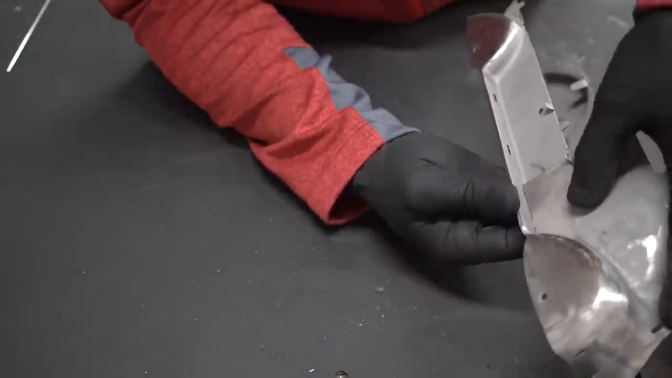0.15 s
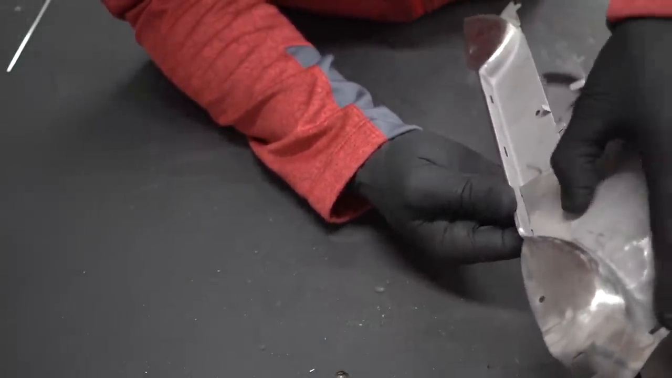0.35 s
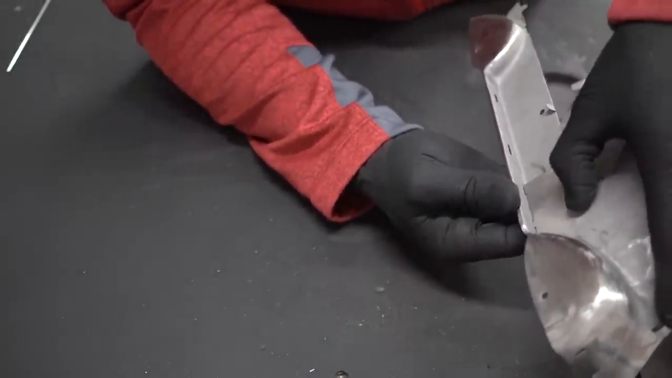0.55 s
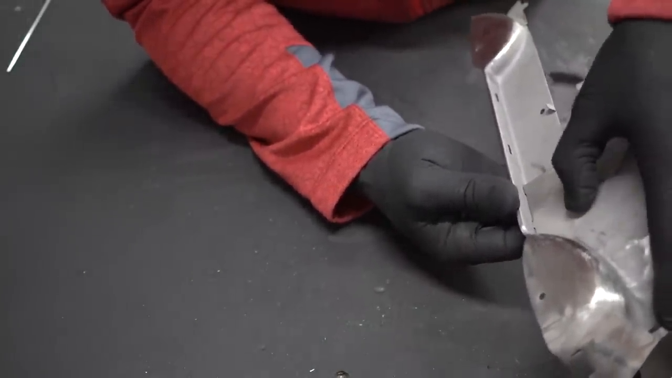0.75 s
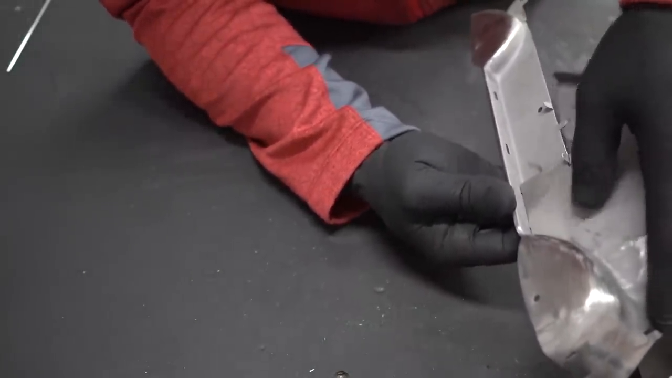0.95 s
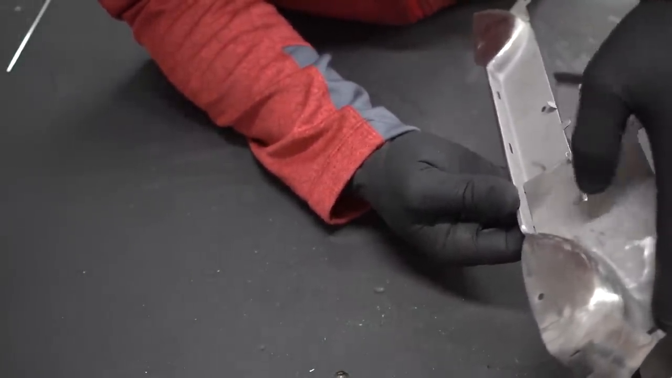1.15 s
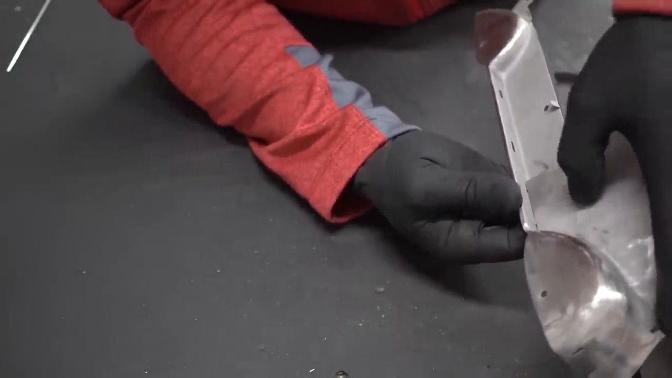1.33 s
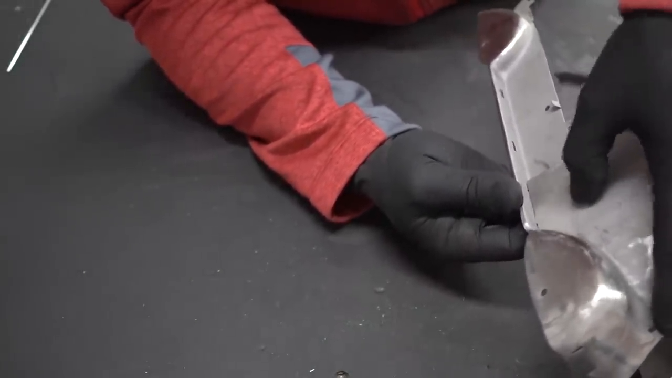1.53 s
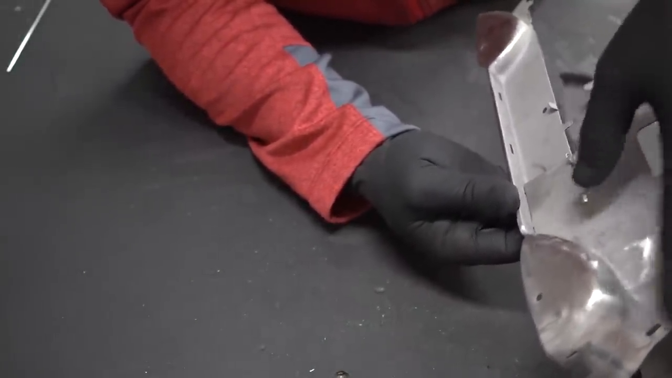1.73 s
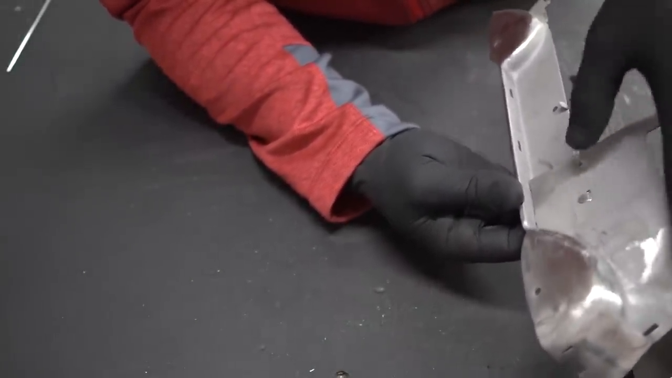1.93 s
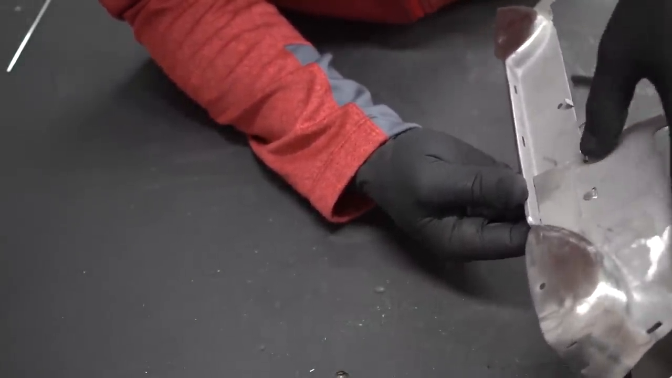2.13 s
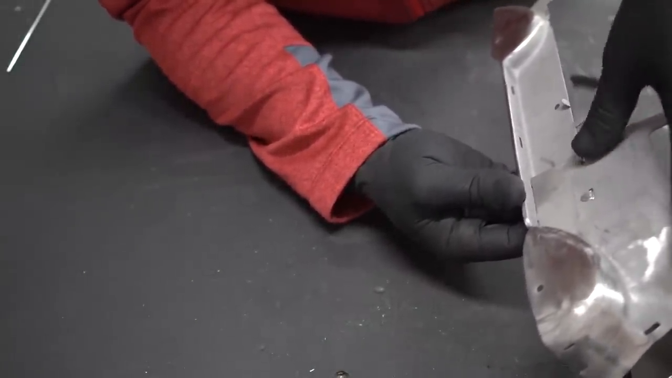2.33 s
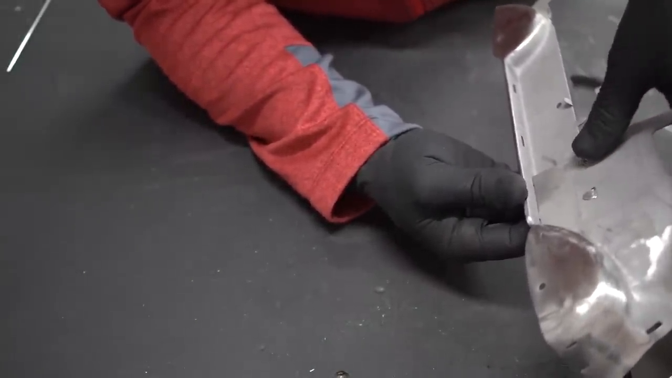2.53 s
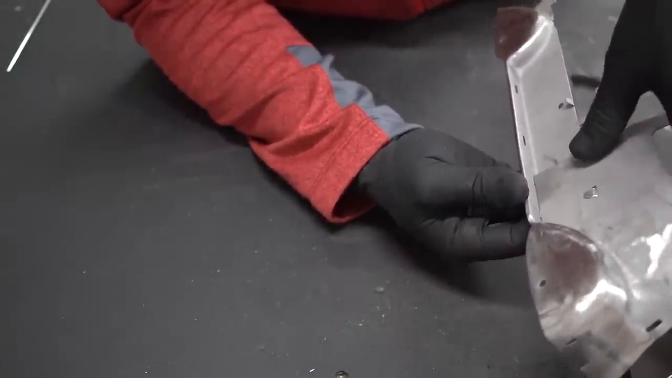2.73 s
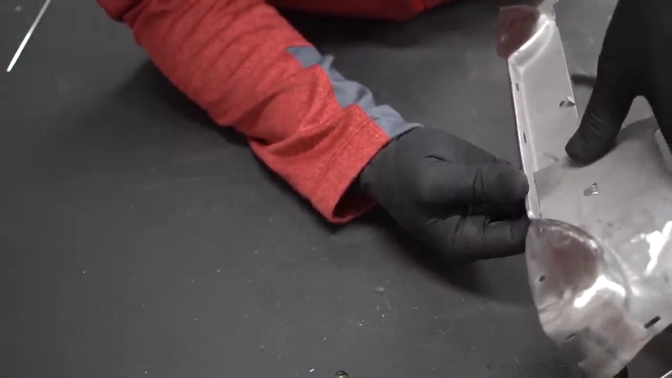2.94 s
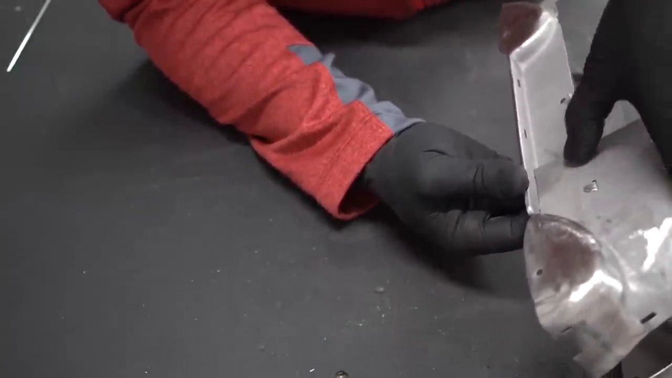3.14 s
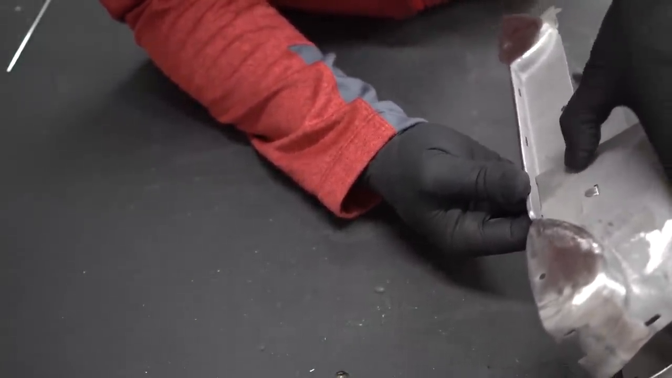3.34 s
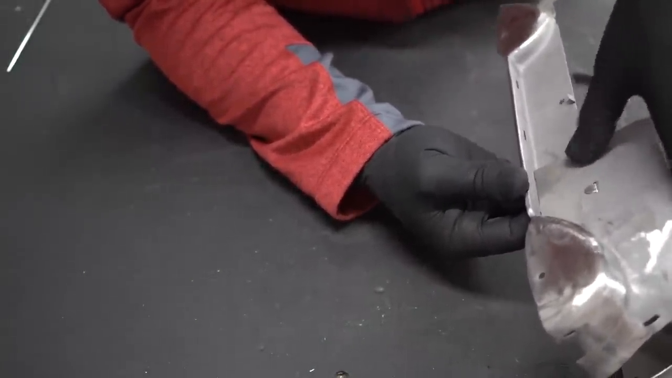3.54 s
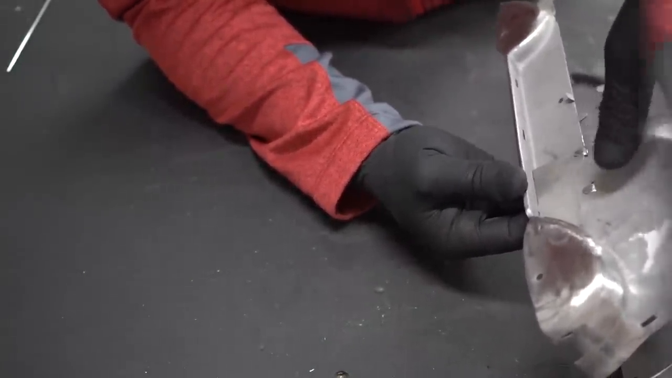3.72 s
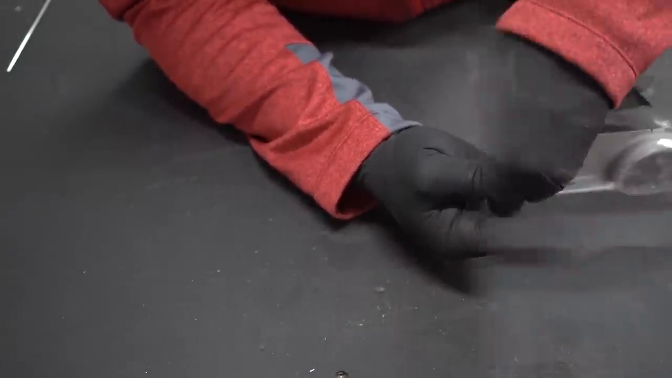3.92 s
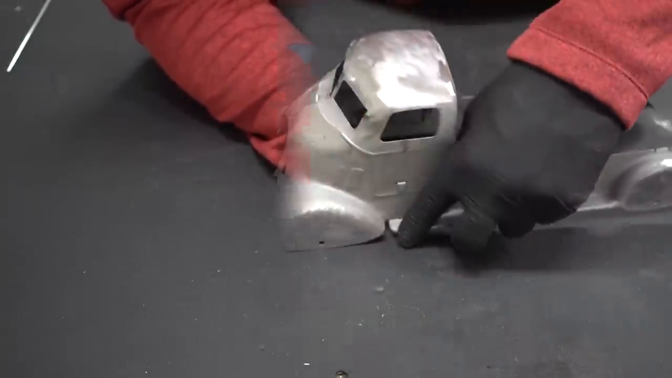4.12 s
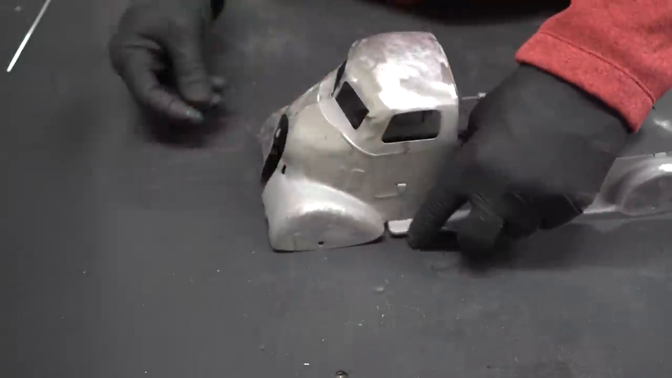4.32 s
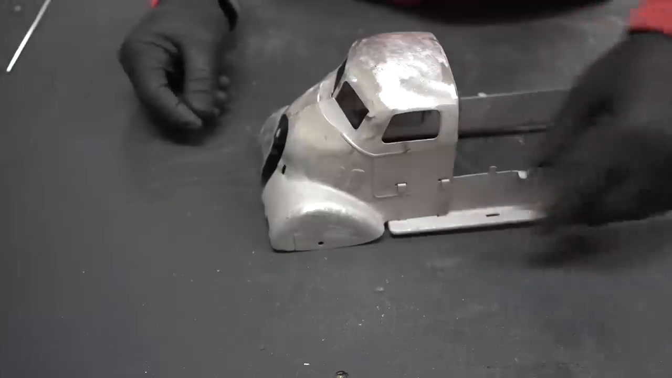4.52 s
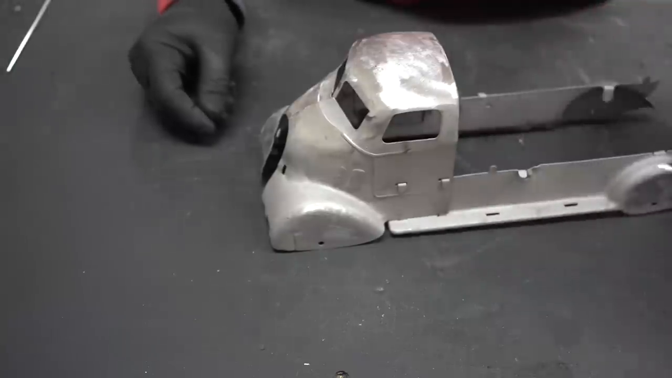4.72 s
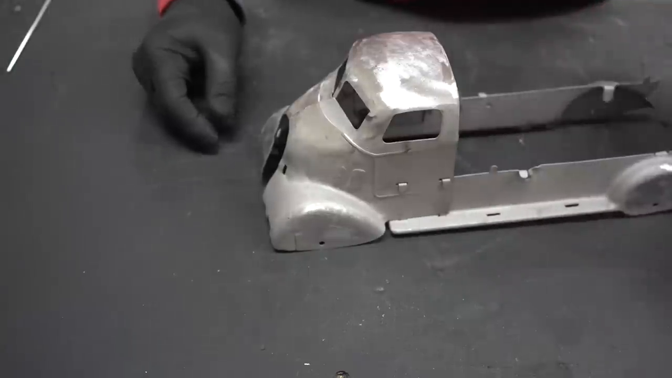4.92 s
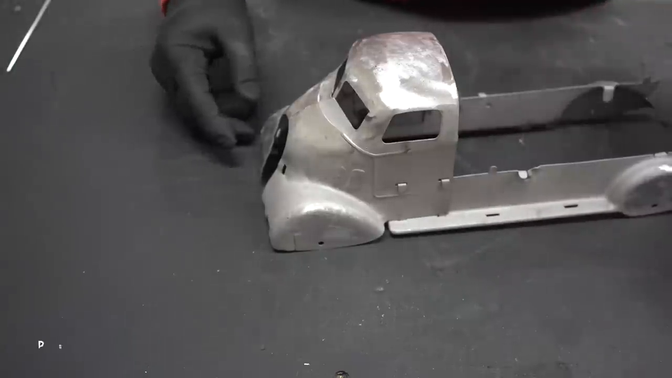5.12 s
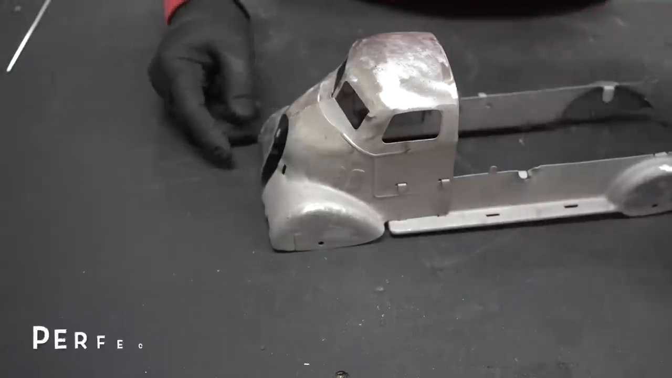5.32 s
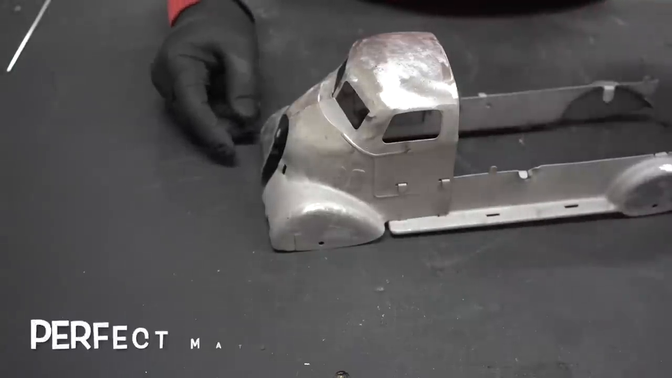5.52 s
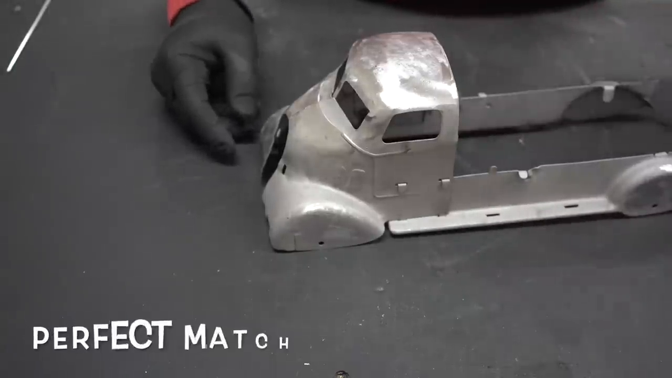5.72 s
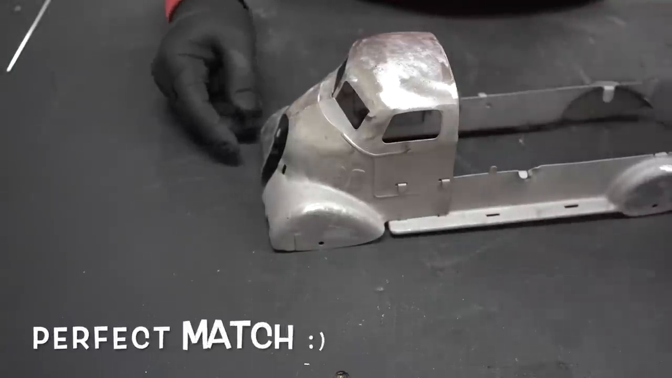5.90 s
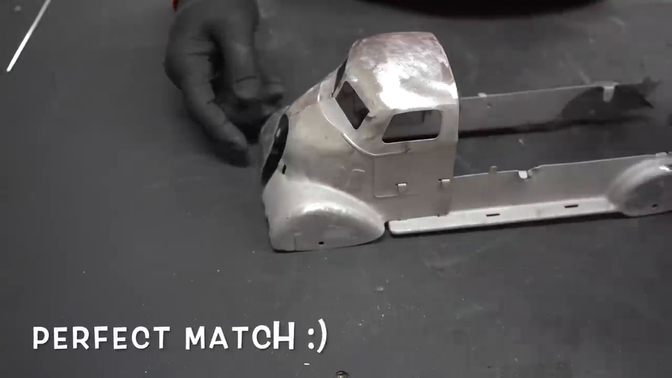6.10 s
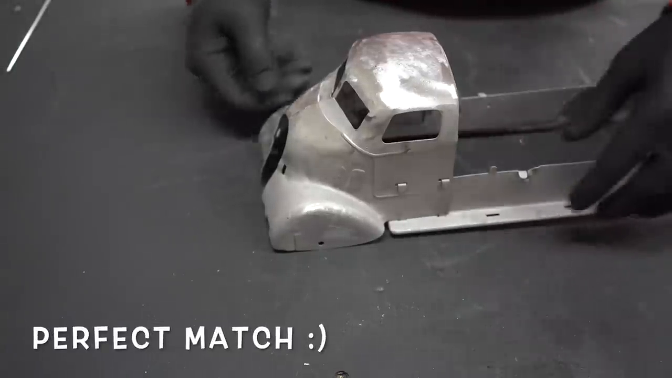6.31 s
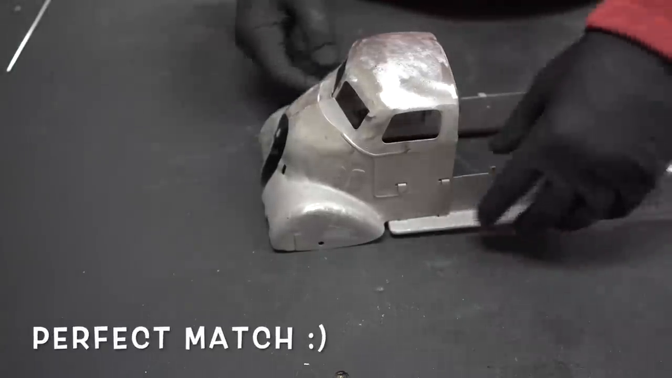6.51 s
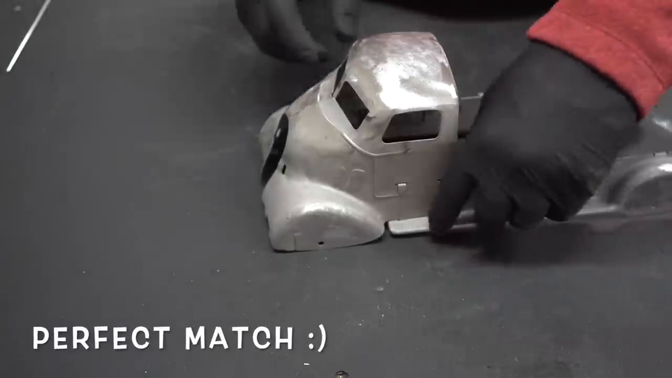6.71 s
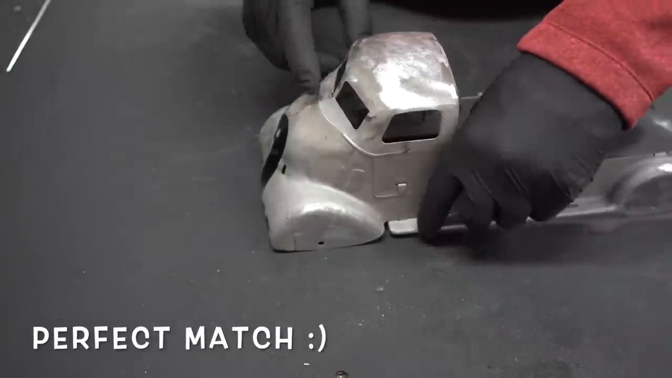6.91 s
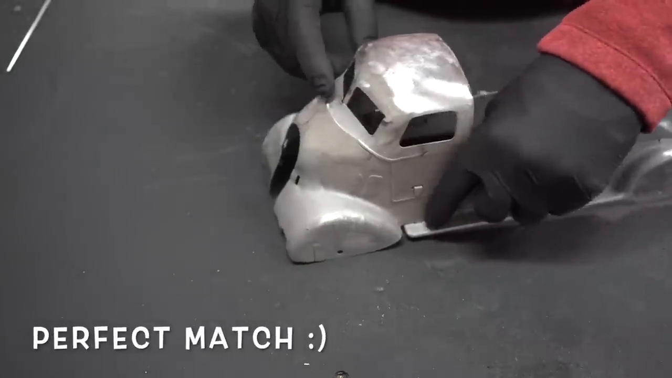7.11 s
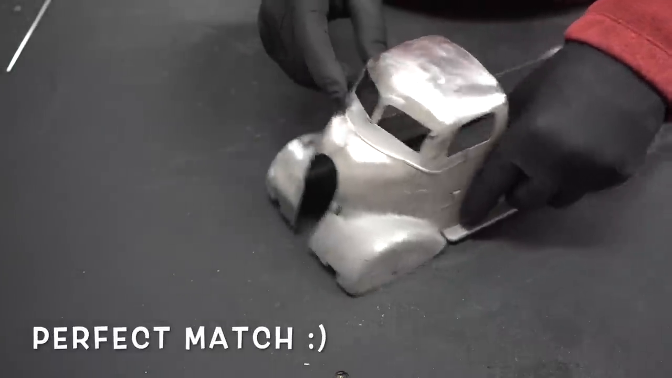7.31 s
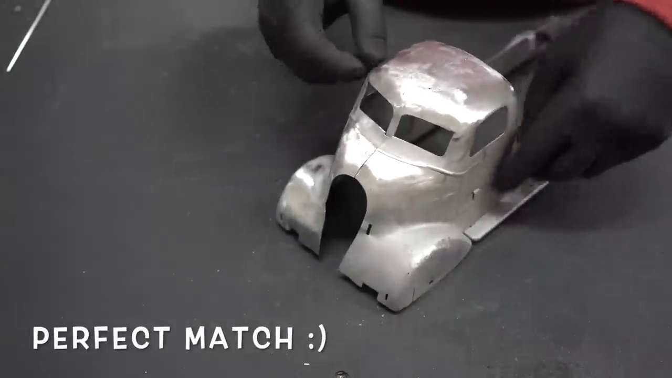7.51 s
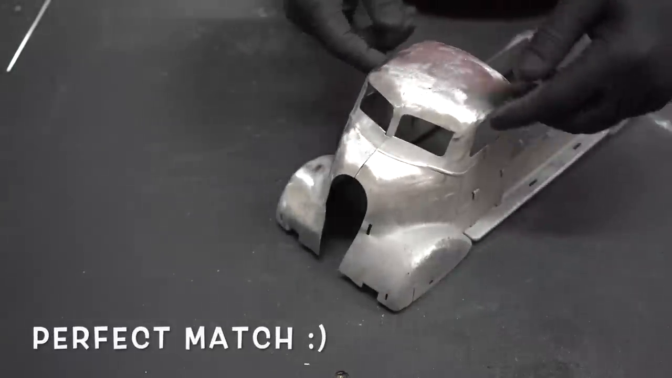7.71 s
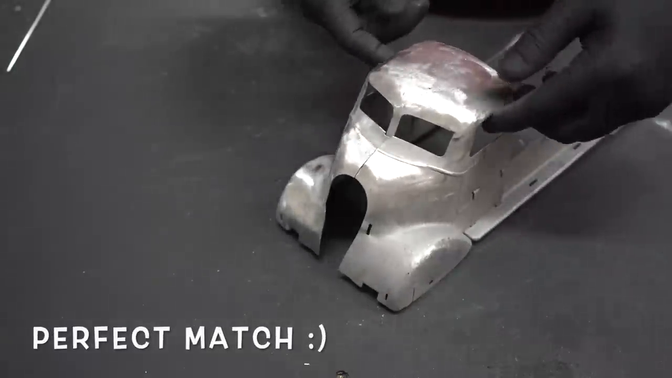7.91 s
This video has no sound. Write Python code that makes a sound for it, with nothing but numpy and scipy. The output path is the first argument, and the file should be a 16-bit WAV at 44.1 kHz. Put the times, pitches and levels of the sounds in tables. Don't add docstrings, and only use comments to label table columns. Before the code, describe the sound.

Sparse tab snaps, loose rattles and padded bumps come first, over low handling rumble. A firm glove rub leads to a cluster of knocks as the metal body lands on the bench. Quiet tinkles and a dusty pull follow, a pure steel ring fades, then a rough ringing scrape peaks near the end. Close microphones, slightly right, short room echo, faint hiss.

```python
import sys
import numpy as np
from scipy import signal
from scipy.fft import rfft, irfft, next_fast_len
from scipy.io import wavfile

SR = 44100
rng = np.random.default_rng(int(sys.argv[2]) if len(sys.argv) > 2 else 0)


def gain_from_decibels(decibels):
    exponent = np.asarray(decibels, float) / 20
    return 10 ** exponent


def materialize(psi):
    bounded = np.clip(np.atleast_2d(psi).T, -1, 1)
    quanta = np.round(bounded * 32767).astype(np.int16)
    wavfile.write(sys.argv[1], SR, quanta)


N = 350595


def unit(x):
    return x / np.sqrt(np.mean(x ** 2) + 1e-20)


def along(points, hz):
    f, v = np.transpose(points)
    return np.interp(np.log(hz + 1), np.log(f + 1), v)


def filtered(x, response):
    m = next_fast_len(x.shape[-1] + 8192)
    spectrum = rfft(x, m) * response(np.fft.rfftfreq(m, 1 / SR))
    return irfft(spectrum, m)[..., :x.shape[-1]]


def body(modes):
    def resonance(f, center, width, db):
        return gain_from_decibels(db) * 1j * f * width / (center * center - f * f + 1j * f * width)
    return lambda f: sum((-1) ** k * resonance(f, *mode) for k, mode in enumerate(modes))


def band(x, low_hz, high_hz):
    return unit(signal.sosfilt(signal.butter(3, [low_hz, high_hz], "band", fs=SR, output="sos"), x))


def fade(t, t60, attack=0.00013):
    return gain_from_decibels(-60 * t / max(t60, .004)) * (1 - np.exp(-t / attack))


def add(track, s, sound):
    part = track[round(s * SR):][:len(sound)]
    part += sound[:len(part)]


# (frequency [Hz], likeness)
LIKENESS = [(25, 1), (60, 1), (290, 0.99), (640, 0.64), (1400, 0.028), (6800, -0.21), (15000, -0.021)]


def paired(pair):
    turn = lambda hz: np.arccos(np.clip(along(LIKENESS, hz), -1, 1)) / 2
    mid, side = filtered(pair, lambda hz: np.array([np.cos(turn(hz)), np.sin(turn(hz))]))
    return np.array([mid + side, mid - side])


# (frequency [Hz], level [dB per Hz])
AIR_COLOR = [(13, -32), (22, -1.5), (118, -1.5), (184, -14), (249, 0), (330, -18), (1400, -19),
             (16000, -29)]


def air():
    hiss = filtered(rng.standard_normal((2, N)), lambda hz: gain_from_decibels(along(AIR_COLOR, hz)))
    return gain_from_decibels(-55) * unit(paired(hiss))


# (frequency [Hz], t60 [s])
ECHO_T60 = [(100, 0.44), (700, 0.77), (2000, 0.59), (5000, 0.54), (13000, 0.28)]


def workshop(x, size=16384):
    out = np.zeros((2, N + size + 2 * SR))
    for start in range(0, N, size):
        hz, t, z = signal.stft(rng.standard_normal((2, SR * 3 // 4)), SR, nperseg=256)
        decay = gain_from_decibels(-60 * t / along(ECHO_T60, hz)[:, None])
        tail = signal.istft(z * decay, SR, nperseg=256)[1]
        echo = signal.fftconvolve(x[None, start:start + size], tail / np.linalg.norm(tail[0]), axes=1)
        out[:, start + 200:][:, :echo.shape[1]] += echo
    return paired(out[:, :N])


def ports(x, lean_db, lag_s):
    def half(hz):
        shade = gain_from_decibels(lean_db / 2 * hz / (hz + 1500))
        return shade * np.exp(1j * np.pi * hz * lag_s / (1 + hz / 1600))
    return np.array([filtered(x, lambda hz: 1 / half(hz)), filtered(x, half)])


# (frequency [Hz], width [Hz], level [dB])
FRAME_MODES = [(116.4, 8.3, 0)]
BENCH_MODES = [(185, 26, -4), (250, 39, -3.5), (267.3, 20.6, 2), (334, 21, -2.5), (371.3, 26.3, -2),
               (483.6, 97, -10)]
PANEL_MODES = [(614, 71, 1.5), (777, 11.6, 6.5), (836, 8, 6), (893, 95, -1.5), (1104, 42, -4.5),
               (1224, 73, -4), (1560, 1580, -12.5)]
SHELL_MODES = [(3110, 31, -18), (3320, 34, -8.5), (4320, 230, -6), (6360, 51, 8.5), (8440, 89, 0)]


def friction(gains, grit, lumpy_db, shell):
    boom, rumble, drone, scrape = gains
    lumps = np.minimum(rng.exponential(size=N // 128 + 1), 3.5)
    grains = gain_from_decibels(lumpy_db * lumps.repeat(128)[:N]) * rng.standard_normal((4, N))
    bright = lambda hz: gain_from_decibels(along(grit, hz)) * (1 + shell * np.abs(body(SHELL_MODES)(hz)))
    return (boom * unit(filtered(grains[0], body(FRAME_MODES)))
            + rumble * unit(filtered(grains[1], body(BENCH_MODES)))
            + drone * unit(filtered(grains[2], body(PANEL_MODES)))
            + scrape * unit(filtered(grains[3], bright)))


def strokes(rows, axis=2):
    t = np.arange(N) / SR
    swell_db, let_go = 28.5, 1.02
    total = 0
    for row in rows:
        peak_s, build_s = row[:2]
        distance = np.maximum(peak_s - t, (t - peak_s) / let_go) / build_s
        total = total + gain_from_decibels(row[axis] - swell_db * distance)
    return total


# (peak time [s], build-up [s], level [dB])
LEANING = [(0, 0.38, -29.5), (1.3, 0.1, -33), (1.67, 0.36, -43), (2.23, 0.41, -38), (2.58, 0.19, -41),
           (3.7, 0.058, -58), (4.2, .15, -47), (4.39, 0.083, -37), (5.31, .3, -54), (6.0, 0.18, -29.5),
           (6.33, .2, -69), (6.74, .25, -49)]
# (peak time [s], build-up [s], bench rumble [dB], panel drone [dB])
SHIFTING = [(.38, 0.13, -46, -42.5), (.85, 0.11, -63, -35.5), (.93, .1, -43, -41), (1.1, .15, -61, -53),
            (1.39, 0.29, -50, -44.5), (1.67, 0.41, -50, -66), (1.92, 0.6, -39.5, -45),
            (2.23, 0.16, -52, -57), (2.5, 0.37, -63, -62), (2.99, 0.13, -47, -49.5), (3.23, 0.36, -48, -47),
            (3.62, 0.17, -37.5, -40), (4.1, 0.077, -54, -29), (4.22, 0.36, -33, -33.5),
            (4.39, 0.04, -62, -57), (4.82, 0.093, -43.5, -47.5), (4.97, 0.45, -51.5, -50),
            (5.31, 0.37, -57, -60), (6.25, 0.44, -61, -59), (6.98, 0.58, -58, -56)]
# (peak time [s], build-up [s], level [dB])
RUBBING = [(.83, 0.11, -63), (1.39, 0.083, -62), (1.67, 0.3, -43.5), (1.81, 0.3, -48.5), (2.23, .17, -47),
           (2.6, 0.31, -52.5), (3.12, 0.069, -43), (3.7, 0.14, -25.5), (3.81, 0.11, -46), (4.08, 0.12, -58),
           (4.39, 0.2, -45), (4.8, 0.19, -45.5), (5.4, 0.9, -57.5), (6.2, 0.17, -59), (6.6, 0.12, -62),
           (6.9, 0.36, -50.5), (7.92, 0.13, -45)]
IDLE_DB = (-46, -68.5, -116, -72)
# (frequency [Hz], level [dB per Hz])
GLOVE_COLOR = [(880, -35), (1500, 0), (2080, 6.5), (2460, 4), (2910, 1), (3550, 4), (13800, 1), (16000, -1)]


def handling():
    moves = [strokes(LEANING), strokes(SHIFTING), strokes(SHIFTING, axis=3), strokes(RUBBING)]
    gains = [gain_from_decibels(-6.5) * (move + gain_from_decibels(db)) for move, db in zip(moves, IDLE_DB)]
    return friction(gains, GLOVE_COLOR, lumpy_db=3.5, shell=0.18)


def drag(passes, grit, trim_db, grit_db, lumpy_db, shell):
    frame_db, grit_grows, full_speed_db = 2, 1.82, -22
    gains = 0
    for rows in passes:
        s, *controls = np.transpose(rows)
        weight, speed = [np.interp(np.arange(N) / SR, s, c, -120, -120) for c in controls]
        scrape = grit_db + speed + (grit_grows - 1) * (speed - full_speed_db)
        gains = gains + gain_from_decibels(trim_db + np.array([weight + frame_db, weight, speed, scrape]))
    return friction(gains, grit, lumpy_db, shell)


# (time [s], weight on the bench [dB], sliding speed [dB])
PULL_PATH = [(5.425, -57, -56), (5.474, -36.5, -48), (5.51, -39, -43), (5.602, -28, -37.5),
             (5.688, -34.5, -31.5), (5.82, -19, -33), (5.854, -42, -38.5), (5.89, -29, -32),
             (5.95, -43, -36.5)]
# (frequency [Hz], level [dB per Hz])
DUST_COLOR = [(880, -31), (1500, -4), (1670, 14), (2210, 3), (2660, -9), (4970, -20), (14100, -26),
              (16000, -27)]


def pull():
    return drag([PULL_PATH], DUST_COLOR, trim_db=-1.5, grit_db=-1.0, lumpy_db=3.0, shell=0.4)


# (time [s], weight on the bench [dB], sliding speed [dB])
TURN_PATH = [(6.99, -72, -76), (7.026, -49, -33.5), (7.134, -14, -32), (7.15, -16.5, -19),
             (7.3, -22, -19.5), (7.35, -35, -21), (7.368, -40, -33)]
SWING_PATH = [(7.355, -61, -45), (7.37, -25.5, -27), (7.453, -17.5, -16.5), (7.5, -20.5, -27),
              (7.525, -19, -30), (7.545, -27, -25.5), (7.638, -49, -34.5), (7.78, -38.5, -43),
              (7.95, -73, -60)]
# (frequency [Hz], level [dB per Hz])
GRIT_COLOR = [(880, 2.5), (1500, -1), (2720, 0.5), (5380, -3), (6370, -2.5), (6760, -1.5), (13900, -7),
              (16000, -23)]


def turn_and_swing():
    return drag([TURN_PATH, SWING_PATH], GRIT_COLOR, trim_db=-4.0, grit_db=0.0, lumpy_db=3.0, shell=1.05)


# (frequency [Hz], level [dB], t60 [s])
PART_MODES = [(2130, -1.5, 0.091), (4460, -4.5, 0.19), (5140, -3, .06), (5453, -5, 0.27), (9100, -3, .12),
              (10250, 3.5, 0.089), (12150, -15, .15)]
WASHER_MODES = [(4720, -15, 0.17), (5900, -24, 0.3), (6460, -5, 0.13), (7359, -25, 0.28), (8450, -9, 0.29),
                (11650, -13, 0.18)]
RIVET_MODES = [(5539, 0, .25), (3526, -3, .08)]
TAB_MODES = [(1647, 0, .07), (388, 4, .09), (6480, -9, .07), (7300, -8, .07), (9340, -9, .06)]
LUG_MODES = [(3960, -3, .03), (4150, 0, .035), (4370, -2, .03)]
RIM_MODES = [(1246, 5.5, 0.12), (720, 6, 0.036), (1447, -8, 0.064), (3500, -13, .08)]
# (time [s], level [dB])
PART_TOUCHES = [
    (4.741, -55),
    (4.827, -47),
    (4.84, -50),
]
WASHER_HITS = [
    (4.525, -52),
    (4.536, -49),
]
RIVET_HITS = [
    (4.157, -45),
    (4.22, -49),
    (4.29, -51),
]
TAB_HITS = [
    (.773, -46),
    (.795, -42),
    (.822, -45),
]
LUG_HITS = [
    (3.894, -41),
    (3.905, -62),
    (3.918, -48),
]
RIM_HITS = [
    (1.628, -42),
    (1.68, -47),
    (1.74, -56),
    (3.655, -43),
    (3.688, -39.5),
    (3.73, -48),
    (3.79, -49),
]


def parts():
    out, t = np.zeros(N), np.arange(SR // 2) / SR
    sources = [(PART_TOUCHES, PART_MODES), (WASHER_HITS, WASHER_MODES), (RIVET_HITS, RIVET_MODES),
               (TAB_HITS, TAB_MODES), (LUG_HITS, LUG_MODES), (RIM_HITS, RIM_MODES)]
    for touches, modes in sources:
        for s, db in touches:
            for hz, level, t60 in modes:
                strength = gain_from_decibels(db + level + rng.normal(0, 1.5))
                blur = .035 * np.cumsum(rng.standard_normal(len(t)))
                add(out, s, strength * fade(t, min(t60, .25)) * np.sin(2 * np.pi * hz * t + blur))
    return out


# (frequency [Hz], level [dB], t60 [s], left over right [dB], left-right phase [rad])
TOOL_MODES = [(1957, -26, .58, -5, .9), (1970, -37, .8, 3, -1.5), (4860, -23.5, 1.25, 6, 3.0),
              (4862.7, -23.5, .62, -8, .6), (9468, -20, .56, -6, -.8), (9474, -33, .5, 0, -2.0),
              (15250, -36, .5, 1, -2.2)]
# (time [s], level [dB])
TOOL_HITS = [
    (5.8465, -6),
    (5.859, -5),
]


def tool():
    out, t, side = np.zeros((2, N)), np.arange(SR) / SR, np.array([[.5], [-.5]])
    for s, db in TOOL_HITS:
        since_first = t + s - TOOL_HITS[0][0]
        ring = 0
        for hz, level, t60, pan_db, turn in TOOL_MODES:
            wave = np.sin(2 * np.pi * hz * since_first + side * turn)
            ring = ring + gain_from_decibels(db + level + side * pan_db) * fade(t, t60) * wave
        out[:, round(s * SR):][:, :SR] += ring
    return out


def knocks(rows, clack_db):
    out, t = np.zeros(N), np.arange(SR // 2) / SR
    frame_hz = FRAME_MODES[0][0]
    for s, db, hz, boom_db in rows:
        top = -np.sin(2 * np.pi * hz * t) * fade(t, 11 / hz)
        boom = gain_from_decibels(boom_db + 10.5) * np.sin(2 * np.pi * frame_hz * t) * fade(t, 0.18, attack=0.0059)
        clack = gain_from_decibels(clack_db) * band(rng.standard_normal(len(t)), 302, 1177) * fade(t, 0.048)
        add(out, s, gain_from_decibels(db + 5.5) * (top + boom + clack))
    return out


# (time [s], peak level [dB], pitch [Hz], boom [dB])
HAND_BUMPS = [(.775, -29.5, 412, -39), (1.018, -22.5, 306, -23), (1.058, -37, 340, -22),
              (1.552, -35, 172, -19), (1.578, -32.5, 382, -17), (1.807, -29, 337, -36),
              (1.827, -25, 255, 0), (1.99, -37, 197, -20), (2.925, -42.5, 450, -22), (4.768, -49, 267, 1),
              (5.461, -32, 230, -24), (7.013, -31, 243, -8.5)]


def hand_thumps():
    return knocks(HAND_BUMPS, clack_db=-14)


# (time [s], peak level [dB], pitch [Hz], boom [dB])
METAL_BLOWS = [(.328, -36.5, 410, -12), (.838, -33, 258, -2), (1.416, -41.5, 244, 9),
               (2.728, -48.5, 353, -26), (3.105, -34.5, 197, -7.5), (3.204, -32.5, 188, -5),
               (3.249, -40.5, 220, -33), (3.423, -46, 486, -22.5), (3.528, -32, 240, -3),
               (3.689, -35.5, 186, -29), (4.019, -28, 358, -36), (4.035, -22.5, 276, -7.5),
               (4.148, -18, 248, -19), (4.822, -39.5, 210, -13), (4.996, -45, 324, -8),
               (7.535, -12.5, 268, -17), (7.785, -35.5, 185, -8)]


def metal_knocks():
    return knocks(METAL_BLOWS, clack_db=-8.5)


def snaps(rows, t60, trim_db, sharp=.9, rise_s=.0002):
    out, t = np.zeros(N), np.arange(SR // 4) / SR
    for s, db, panel_db, edge_db, hz in rows:
        noise = rng.standard_normal((4, len(t)))
        tick = sharp * fade(t, .006, attack=.0001)
        sheet = band(noise[0], 2220, 8200) * (tick + fade(t, t60, rise_s))
        cluster = 1.5 * band(noise[1], .87 * hz, 1.13 * hz) * fade(t, .45 * t60, rise_s)
        sizzle = band(noise[2] + .5 * np.roll(noise[2], 1), 7000, 16000)
        edge = gain_from_decibels(edge_db) * sizzle * (tick + fade(t, 1.77 * t60, rise_s))
        panel = gain_from_decibels(panel_db) * band(noise[3], 760, 1970) * fade(t, 1.28 * t60, rise_s)
        add(out, s - .0006, gain_from_decibels(db + trim_db) * (sheet + cluster + edge + panel))
    return out


# (time [s], peak level [dB], low panel [dB], edge [dB], ring [Hz])
CATCHES = [(.0897, -38.5, 3, -4, 5100), (1.9844, -27.5, 2, -6, 2360), (2.1206, -23.5, 0, -18, 2980),
           (3.5309, -15.5, -2, -11.5, 3770), (5.7115, -35, 21, -23, 1950), (6.8302, -47, -12, -10, 3120),
           (7.108, -38, -2, -23, 1890), (7.1471, -19, -13, -11, 4570), (7.199, -26, 5, 1, 1960),
           (7.4092, -5, -13, -6.5, 3230), (7.4639, -20, 5, 8, 3120), (7.4994, -25, 14.5, 8, 2360)]


def jolts():
    return snaps(CATCHES, t60=0.019, trim_db=-11)


# (time [s], peak level [dB], low panel [dB], edge [dB], ring [Hz])
SHEET_FLEXES = [
    (.7701, -45, -9, -9, 2600),
    (1.5974, -39, -0.5, -2, 3000),
    (1.8098, -46, -8, -35, 3470),
    (1.8327, -48.5, 4, -6.5, 1840),
    (2.9094, -56.5, 6.5, -4, 2730),
    (3.1144, -44.5, -8, -16, 2160),
    (4.0274, -35.5, -25, -38.5, 2470),
]


def flexes():
    return snaps(SHEET_FLEXES, t60=0.25, trim_db=-6, sharp=0, rise_s=0.002)


# (time [s], peak level [dB], low panel [dB], edge [dB], ring [Hz])
SET_DOWNS = [
    (3.0779, -52, -10, -6, 4900),
    (4.0397, -31.5, 1, -4, 3470),
    (4.0692, -30, -4, -16, 3630),
    (4.155, -26, 0.5, -10, 3320),
    (4.5241, -46, 0, 0, 6740),
    (4.8244, -44, -24, -13, 2280),
    (5.4524, -50.5, -4, 4, 1820),
    (5.67, -34, 10, -24, 1850),
    (5.8456, -21, -28, -5.5, 5440),
    (7.0125, -49, -6, 1, 3930),
]


def taps():
    return snaps(SET_DOWNS, t60=0.073, trim_db=-6)


# (time [s], peak level [dB], low panel [dB], edge [dB], ring [Hz])
TAB_SNAPS = [(.2244, -52, 1, -6, 3270), (.3267, -46.5, 9, -21, 2020), (.7994, -40, -4, -8, 2400),
             (.853, -26.5, -9, -4.5, 2620), (.9822, -42.5, -19, 5, 2750), (1.2516, -18, -1, -1, 3800),
             (1.4162, -39, 5, -18, 2330), (1.6267, -35.5, -7, -4, 4600), (1.7325, -44, 6, -13, 4320),
             (3.1727, -43.5, 0, 9.5, 4900), (3.1981, -35, -4.5, -22, 3660), (3.2625, -39.5, -2, 0, 3200),
             (3.6292, -18, -1.5, 3.5, 3980)]


def tab_snaps():
    return snaps(TAB_SNAPS, t60=0.05, trim_db=-7)


SHEET_MODES_HZ = [924, 1236, 1470, 3260, 3690, 4160, 7070]


def sheet_modes(hz):
    sharpness, level_db = 30, 2
    return 1 + body([(c, c / sharpness, level_db) for c in SHEET_MODES_HZ])(hz)


def scene():
    rubs = handling() + pull() + turn_and_swing()
    blows = filtered(tab_snaps() + taps() + flexes(), sheet_modes)
    blows += jolts() + metal_knocks() + hand_thumps() + parts()
    ring = tool()
    wet = workshop(blows + gain_from_decibels(-2.0) * rubs + gain_from_decibels(-17) * ring[0])
    near = ports(blows + rubs, lean_db=4, lag_s=.00013)
    low_cut = lambda hz: (1j * hz / (72 + 1j * hz)) ** 7
    return filtered(near + wet, low_cut) + ring + air()


def low_pass(x):
    return signal.sosfilt(signal.butter(12, 17010, fs=SR, output="sos"), x)


def record(dry):
    soft = dry / (1 + np.abs(dry / .8) ** 4) ** (1 / 4)
    mix = filtered(soft, lambda hz: 1 / (1 + (hz / 16100) ** 60))
    return low_pass(mix)


dry = scene()
out = record(dry)
materialize(out)
```